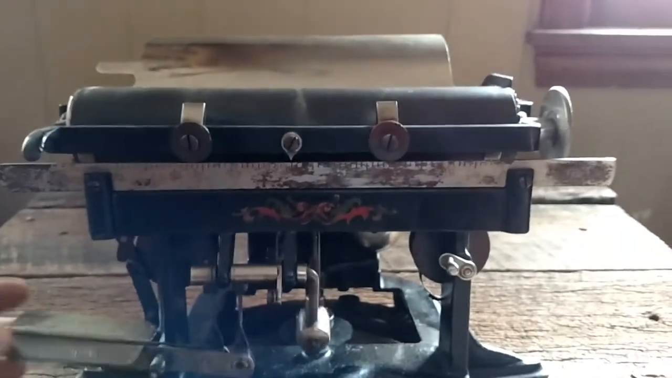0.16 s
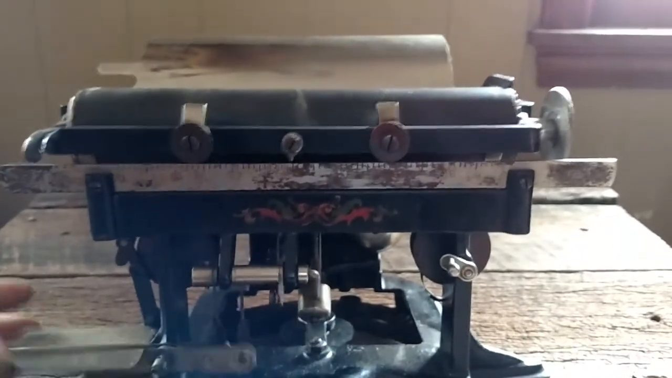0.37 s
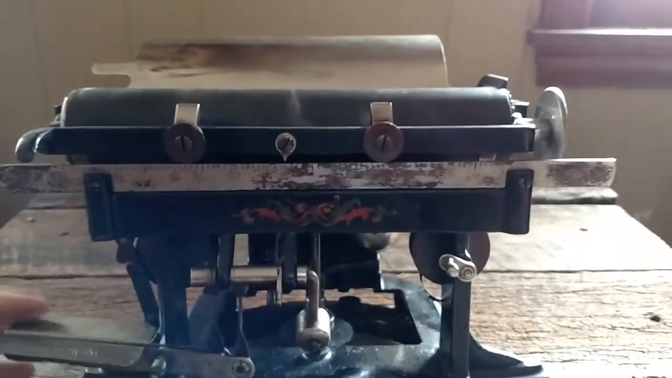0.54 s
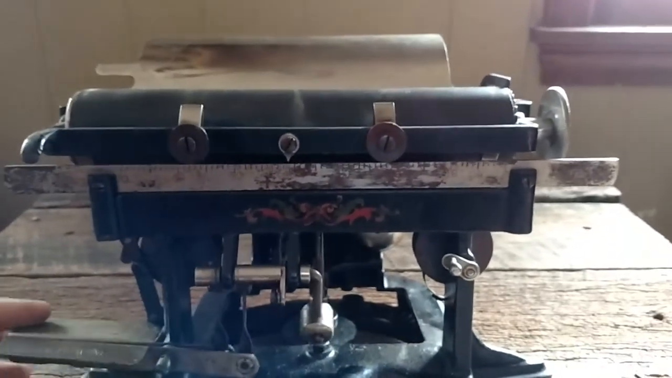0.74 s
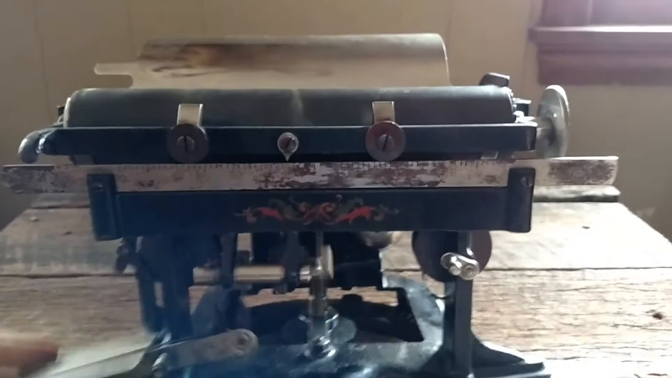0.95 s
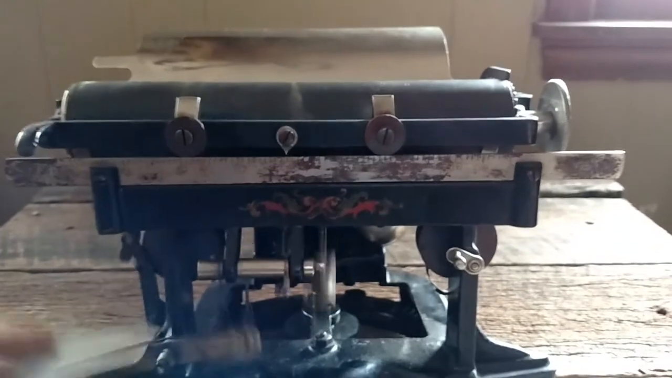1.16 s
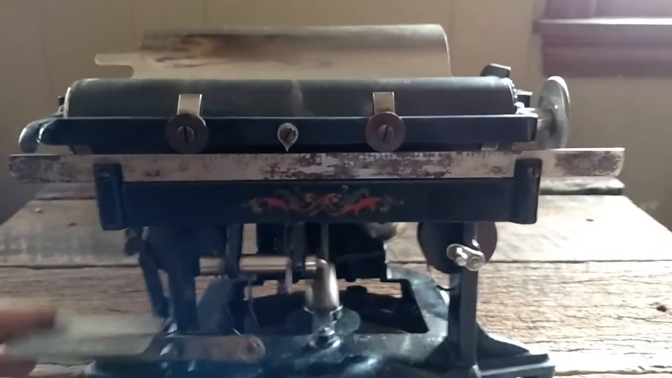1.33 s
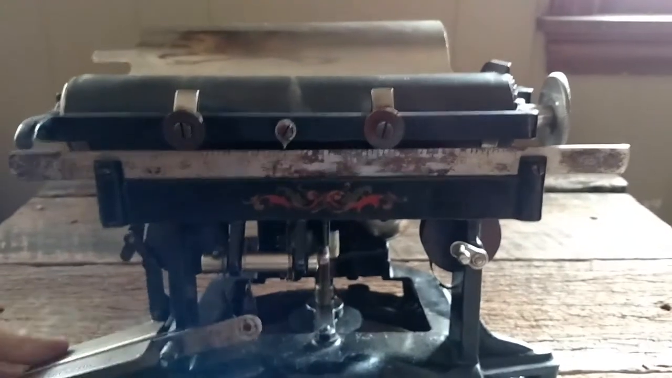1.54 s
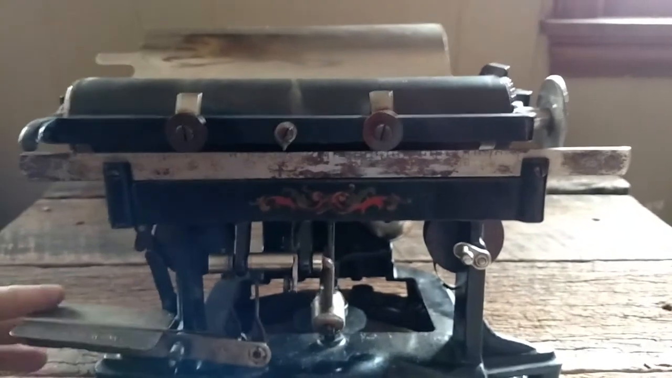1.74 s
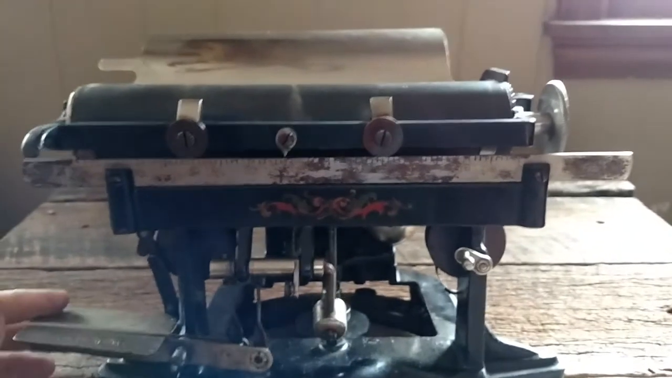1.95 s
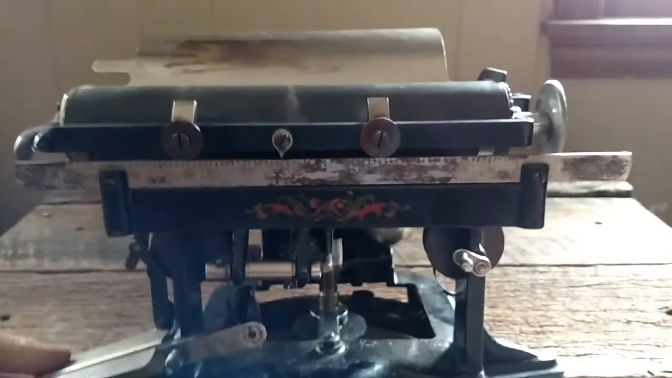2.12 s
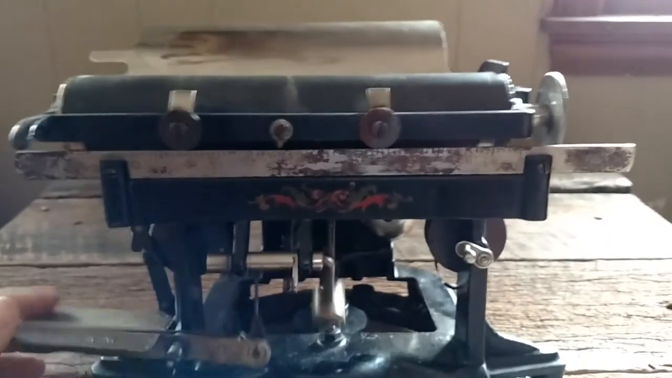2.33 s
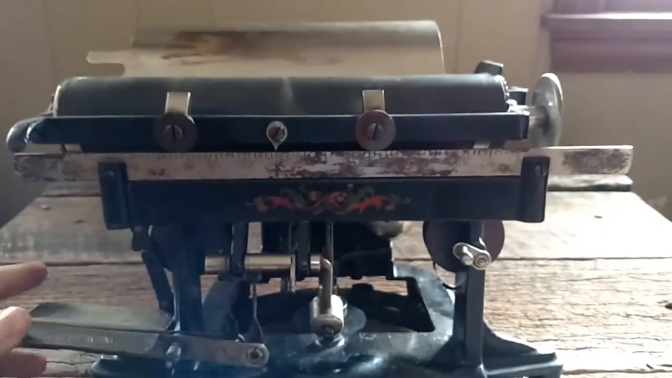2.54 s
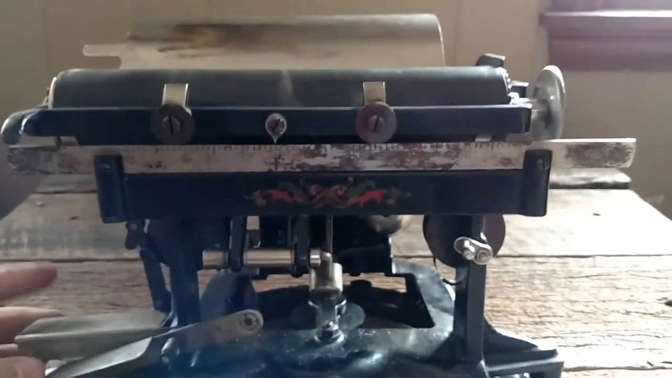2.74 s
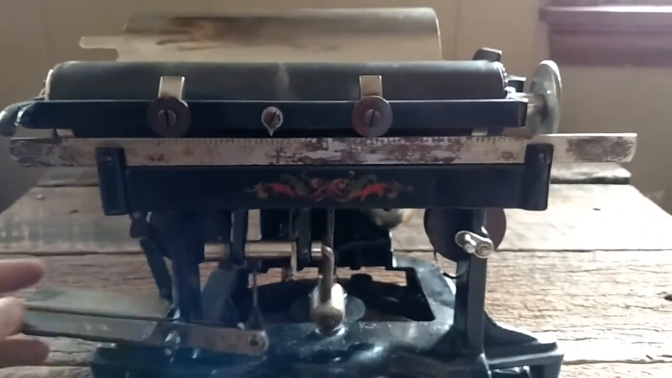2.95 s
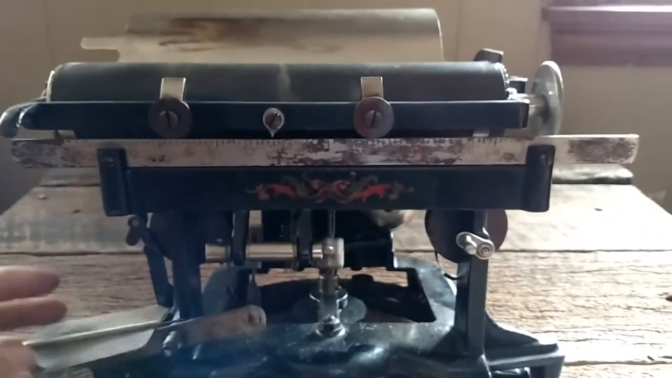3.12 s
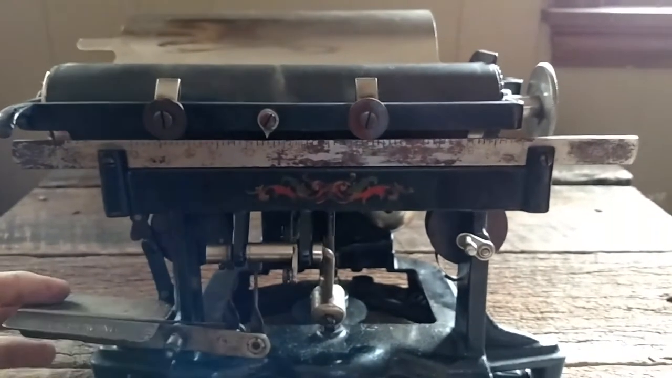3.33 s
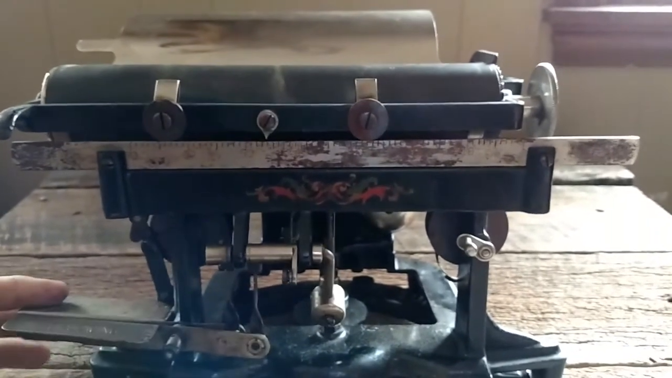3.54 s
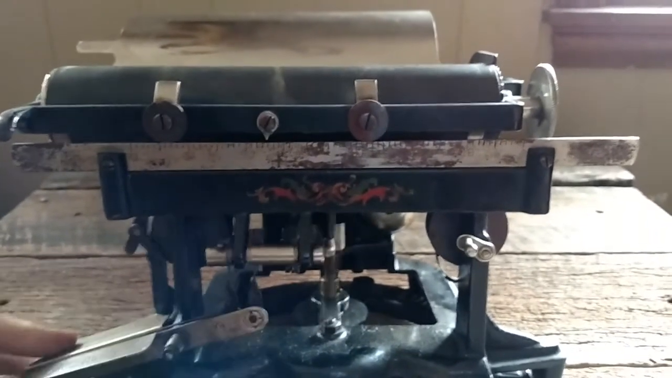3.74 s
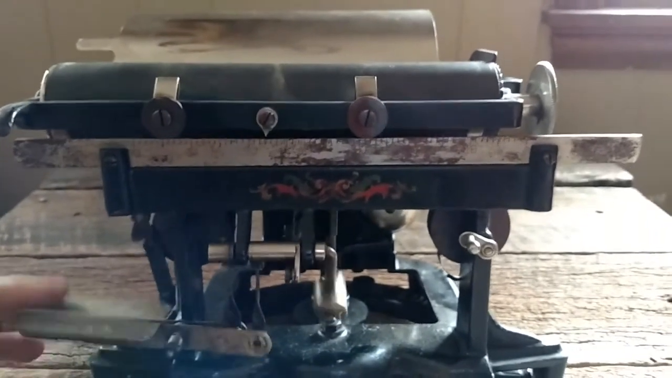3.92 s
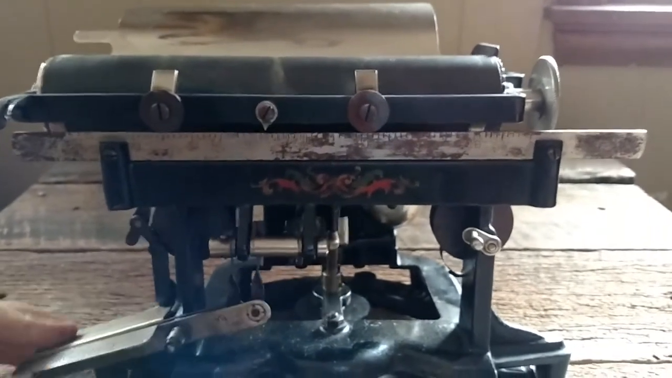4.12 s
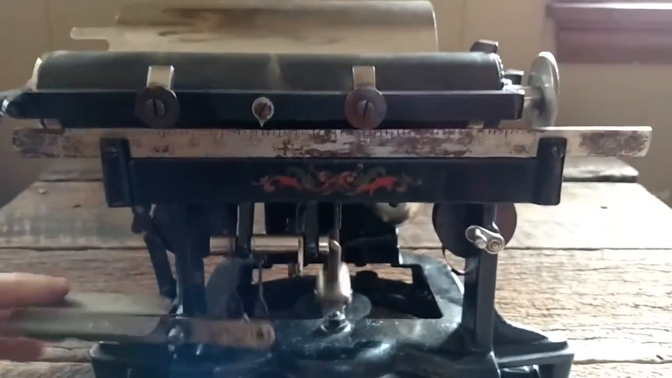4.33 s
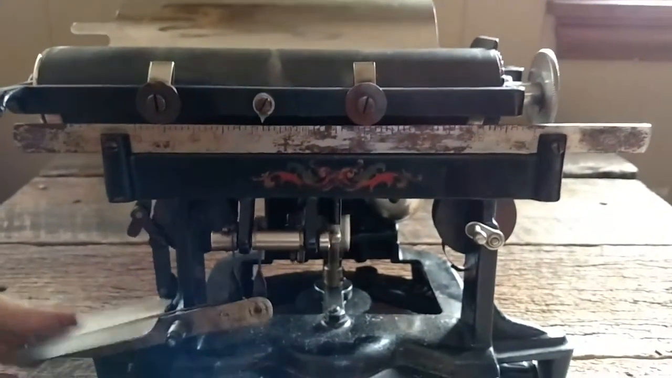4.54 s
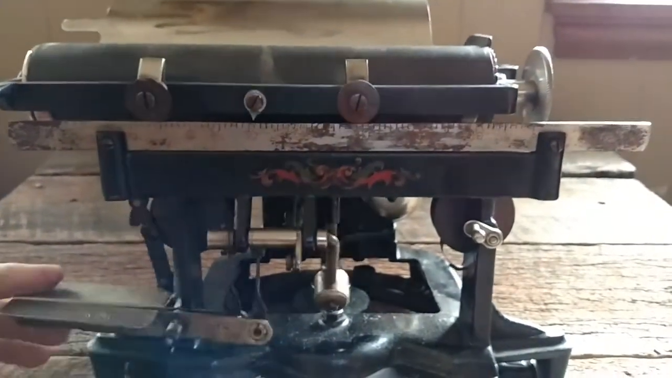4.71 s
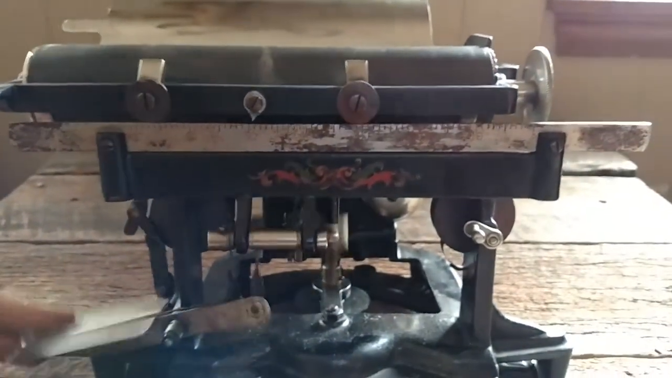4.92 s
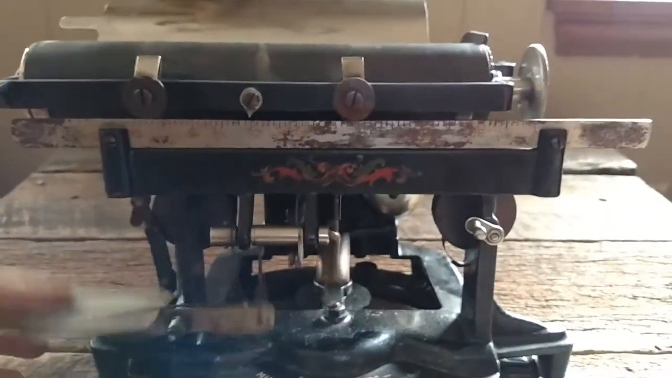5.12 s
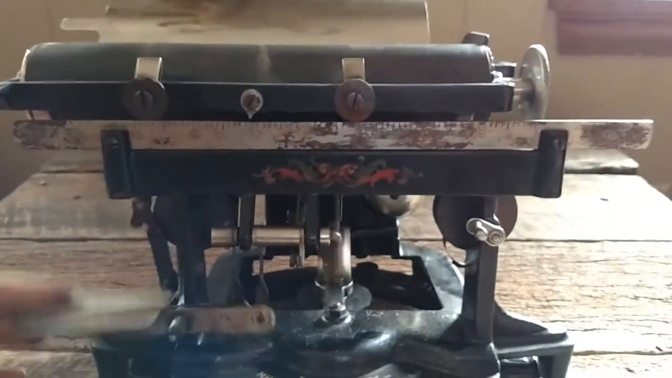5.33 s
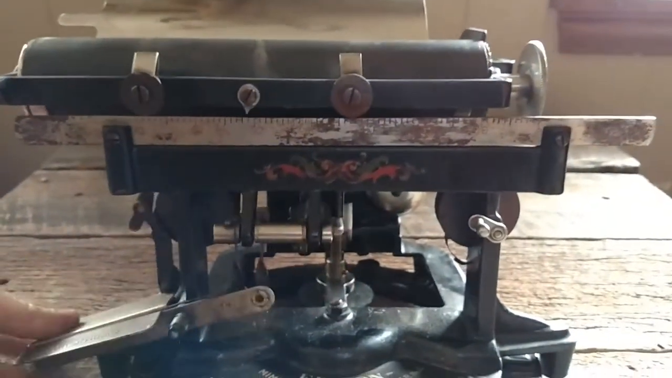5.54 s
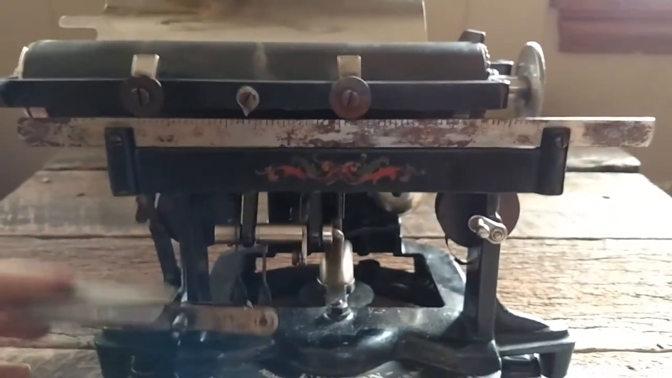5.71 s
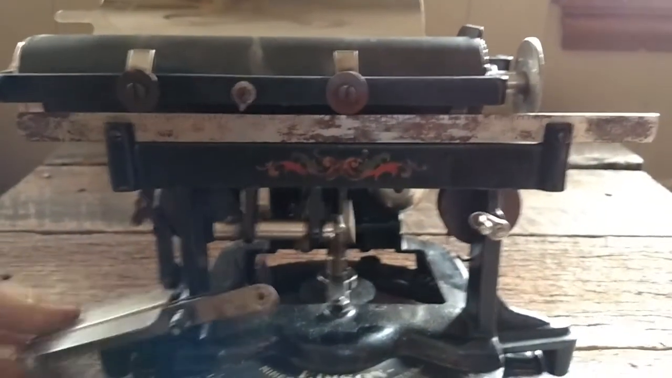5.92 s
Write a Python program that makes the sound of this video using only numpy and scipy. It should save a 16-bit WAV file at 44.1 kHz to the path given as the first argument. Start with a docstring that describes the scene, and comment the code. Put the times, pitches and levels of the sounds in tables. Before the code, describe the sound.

A close view of an old index typewriter worked by hand on a plank table in a small room, over soft room air, a low drone and very faint hiss. At about 0.05 s the lever returns with a click and dull bump; at 0.24 s a light stroke scrapes, ticks and barely touches, and returns at 0.4 s. Firm strokes at 0.86, 1.22, 1.55 and 2.16 s each give a tiny latch tick, bright metal clash, hard mid-pitched knock, small rebound and fading steely shimmer, with a low table boom. Softer returns fall between them. Handling bumps and rumble gather around 2.1-2.9 s, with gentle strokes at 2.68 and 3.03 s and small rattles. After a lull, firm strokes resume at 3.75, 4.08, 4.43, 4.87, 5.2, 5.55 and 5.96 s, the later knocks weaker, with a prominent dull bump near 4.8 s.

```python
"""Index typewriter on a plank table

An old index typewriter is worked by hand in a small room, close to the microphone.
Each printing stroke trips a latch, clashes the linkage and knocks the type head on the platen; the table booms.
Light strokes slide, tick the lever and touch down gently; returns click the pawl and jolt the planks.
Struck parts are flurries of contacts ringing resonances; bumps are swelling sines, rumble and air shaped noise."""
import sys
import numpy as np
from scipy import signal
from scipy.fft import rfft, irfft
from scipy.io import wavfile

SR = 44100
rng = np.random.default_rng(int(sys.argv[2]) if len(sys.argv) > 2 else 0)


def log_audio(samples):
    """Write samples as a 16-bit WAV file to the path given in sys.argv[1]."""
    # one column per channel
    frames = np.atleast_2d(samples).T
    # limit to full scale, then quantise
    limited = np.clip(frames, -1, 1)
    pcm = np.round(limited * 32767).astype(np.int16)
    wavfile.write(sys.argv[1], SR, pcm)


N = 263277  # length in samples

# Levels in the event tables are settings ahead of the trims in the functions.
# printing strokes: start_s, latch_lead_s, latch_db, clash_db (linkage), knock_db (head on platen),
# thud_db (into the table), shimmer_peak_hz
STROKES = [(0.8573, 0.014, -41, -39, -20.5, -40.5, 7500), (1.2238, 0.014, -40.5, -36, -23.5, -50, 6760),
           (1.5486, 0.014, -43, -35, -24.5, -43, 6800), (2.1560, 0.015, -41.5, -34.5, -26, -56, 8200),
           (3.7492, 0.01, -42, -33.5, -24.5, -40.5, 8200), (4.0802, 0.0083, -46, -32, -25, -39.5, 7300),
           (4.4258, 0.011, -50, -34, -26, -41.5, 6760), (4.8653, .014, -45.5, -34.3, -31.5, -48, 8600),
           (5.198, 0.015, -45, -31.5, -26, -44, 8300), (5.5528, .012, -43, -34, -29, -46, 9250),
           (5.964, .021, -47, -39, -36, -41, 8550)]
# light strokes that do not print: start_s, latch_db, touch_delay_s, touch_db (head)
LIGHT_STROKES = [(0.2441, -41, 0.021, -59), (2.6774, -41.5, 0.022, -33.5), (3.0325, -41, .0275, -37.5)]
# the lever comes back up and the carriage steps: start_s (pawl), lever_db, pawl_db,
# planks_db (boom), top_db (low boom of the table top)
RETURNS = [(0.0547, -44, -38, -27, -31), (0.4028, -50, -37, -29.5, -32), (1.0117, -51.5, -63, -31, -27.5),
           (1.3586, -46.5, -76, -28, -30), (1.6981, -48.6, -54, -30, -26.5), (2.3228, -49, -53.5, -28, -24),
           (2.8493, -42.5, -37, -23, -31), (3.1904, -59, -35, -38, -35.5), (3.8963, -50, -50, -30.5, -39),
           (4.2323, -56.5, -72, -35.5, -30.5), (4.5978, -49.5, -48, -30.5, -29),
           (4.996, -50.5, -53, -31, -28.5), (5.358, -47.5, -72, -28, -40), (5.705, -52, -68, -37, -34)]
# resonances of the platen: pitch_hz, width_hz, level_db
PLATEN_MODES = [(815, 80, -8.5), (1196, 135, -5.3), (1278, 135, -2.8), (1660, 80, -7), (2077, 257, 0),
                (2434, 348, -5.5)]
# resonances of the carriage pawl: pitch_hz, width_hz, level_db
PAWL_MODES = [(2900, 900, -11), (4150, 700, -6), (5350, 560, -1), (6000, 560, 0), (6880, 480, 0),
              (8350, 450, -9), (9480, 320, -4), (11100, 500, -11), (13000, 1500, -27)]
# boom spectrum of the planks: pitch_hz, level_db (per Hz)
PLANK_BOOM = [(120, -39), (180, -33), (205, 7), (230, -9), (249, 5), (272, -2), (330, -4.5), (400, -12.5),
              (520, -22), (900, -56)]
# low boom spectrum of the table top: pitch_hz, level_db (per Hz)
TOP_BOOM = [(70, -27), (108, -17), (126, 1), (139, 5.5), (155, -5), (185, -5), (260, -31), (600, -75)]

LEVER_LEAD_S = 0.010  # the lever hits its stop this long before the pawl catches


def amp(db):
    """Turns decibels into a gain."""
    return 10 ** (np.asarray(db) / 20)


def evened(x):
    """Scales to unit rms."""
    return x / np.sqrt(np.mean(x ** 2) + 1e-20)


def sized(x, db):
    """Scales a short sound to the energy of 5 ms at rms level db."""
    return x * amp(db) * np.sqrt(0.005 * SR / (np.sum(x ** 2) + 1e-20))


def read(points, hz, axis=1):
    """Reads one column of a table, joined by straight lines over log frequency."""
    columns = np.transpose(points)
    return np.interp(np.log(hz + 1), np.log(columns[0] + 1), columns[axis])


def add(mix, start_s, sound):
    """Lays a sound into the mix in place, cut off at the end."""
    part = mix[max(round(start_s * SR), 0):][:len(sound)]
    part += sound[:len(part)]


def noise(spectrum, grains_per_s=SR):
    """Noise of unit rms with the given spectrum; with few grains a second it turns lumpy."""
    sparse = rng.random(N) < grains_per_s / SR
    grains = rng.standard_normal(N) * sparse
    colour = amp(read(spectrum, np.fft.rfftfreq(N, 1 / SR)))
    return evened(irfft(rfft(grains) * colour, N))


def ring(modes, size=2048):
    """A part's answer to one tap: decaying sines; neighbours start in opposite directions, so it swells first."""
    t = np.arange(size) / SR
    out = np.zeros(size)
    for k, (hz, width, db) in enumerate(modes):
        decay = np.exp(-np.pi * width * t)  # a wider resonance dies sooner
        out += (-1) ** k * amp(db) * width * decay * np.sin(2 * np.pi * hz * t)
    return out


def varied_ring(modes, lowest, detune, spread_db):
    """No two blows land on quite the same spot, so the modes shift a little in pitch and strength."""
    pitch, strength = rng.uniform(lowest, 1, (2, len(modes)))
    return ring([(hz * (1 + detune * a), width, db + spread_db * b)
                 for (hz, width, db), a, b in zip(modes, pitch, strength)])


def chatter(rise, fall, size=1024):
    """Loose parts meeting: a short flurry of tiny contacts that feeds all pitches about equally."""
    t = np.arange(size) / SR
    envelope = (1 - np.exp(-t / rise)) * np.exp(-t / fall)  # rise and fall in s
    z = rfft(envelope * rng.standard_normal(size))
    flat = irfft(z / (abs(z) + 1e-12))
    return flat * np.sqrt(envelope / envelope.max())


def tilted(x, corner_hz):
    """Softens the treble above a corner; the very top falls away faster."""
    r = np.exp(-2 * np.pi * corner_hz / SR)
    return signal.lfilter([1 - r, 1 - r], [1, -r], x) / 2


def blows(rows, modes, rise, fall, crack_db, crack_hz):
    """Each blow is a flurry of contacts: it rings the part's modes and is heard itself as a crack."""
    out = np.zeros(N)
    for start_s, db in rows:
        body = varied_ring(modes, lowest=-1.12, detune=0.025, spread_db=3)
        force = chatter(rise, fall)
        add(out, start_s, sized(signal.fftconvolve(force, body), db))
        add(out, start_s, sized(tilted(force, crack_hz), db + crack_db))
    return out


def background():
    """Room air, a low drone and a thin band of high hiss, each steady shaped noise."""
    # spectrum of the room air: pitch_hz, level_db (per Hz)
    air_spectrum = [(240, -23), (400, -4.5), (536, -13.5), (598, -10.5), (697, -5.5), (879, -8.5),
                    (1110, -3.5), (1530, -6.5), (2630, -13.5), (3310, -21.5), (3580, -20), (5190, -29.5),
                    (9760, -37.5), (10900, -36), (16000, -65)]
    drone = noise([(20, -48), (60, -14), (138, -4.5), (175, -18.0), (250, 2), (290, -6),
                   (400, -10.5), (600, -27.5), (1500, -51)])
    hiss = noise([(9000, -50), (10400, -12), (10800, 14), (11200, -15), (12500, -50)])
    return amp(-55) * noise(air_spectrum) + amp(-48.5) * drone + amp(-84) * hiss


def handling():
    """A lumpy rumble grows whenever the hands shift and press, and the table booms along with it."""
    # spells of shifting hands: start_s, end_s, effort_db (ahead of the blend below)
    shifts = [(0.01, 0.142, -37), (0.33, 0.586, -51.5), (1.252, 1.445, -44.5), (1.744, 1.802, -49),
              (2.052, 2.56, -43), (2.684, 2.98, -41.5), (3.617, 3.705, -49), (5.123, 5.3, -50.5),
              (5.403, 5.755, -55)]
    # spectrum of the rumble: pitch_hz, level_db (per Hz)
    rumble_spectrum = [(15, -2.5), (30, -10.5), (55, -5.5), (85, -6), (110, -4), (160, -42.5), (400, -76)]
    resting_db, fade_s, grains_per_s = -51, 0.049, 900
    t = np.arange(N) / SR
    effort = np.full(N, amp(resting_db))
    for start, end, db in shifts:
        effort += amp(db) * np.interp(t, [start - fade_s, start, end, end + fade_s], [0, 1, 1, 0])
    rumble = amp(-1.5) * noise(rumble_spectrum, grains_per_s)
    top = amp(-5.5) * noise(TOP_BOOM, grains_per_s)
    planks = amp(-12) * noise(PLANK_BOOM, grains_per_s)
    return effort * (rumble + top + planks)


def lever():
    """The key lever ticks as it trips the latch and as the head touches, and more dully back at its stop."""
    # resonances of the key lever: pitch_hz, width_hz, level_db
    lever_modes = [(2210, 165, 2), (2700, 140, 3), (3250, 185, 9), (4680, 190, -3.5), (5340, 1400, -15.5),
                   (6150, 180, -0.5), (6800, 260, -8), (8300, 1640, -12.5)]
    touch_tick_db = -19.5  # tick of the lever against the touch setting of the head
    ticks = [(s - lead, db) for s, lead, db, *_ in STROKES]
    for s, db, delay, touch_db in LIGHT_STROKES:
        ticks += [(s, db), (s + delay, touch_db + touch_tick_db)]
    stops = [(s - LEVER_LEAD_S, db) for s, db, *_ in RETURNS]
    tripping = blows(ticks, lever_modes, rise=0.00023, fall=0.0027, crack_db=-12.5, crack_hz=2500)
    stopping = blows(stops, lever_modes, rise=0.00035, fall=0.0023, crack_db=-22, crack_hz=2500)
    return amp(2.05) * tripping + amp(4.55) * tilted(stopping, corner_hz=3000)


def booms(rows, spectrum, peak_s, steepness):
    """Each push sets the wood shaking: the boom swells to a peak and dies away."""
    out, wood = np.zeros(N), noise(spectrum)
    u = np.arange(SR // 3) / SR / peak_s
    swell = (u * np.exp(1 - u)) ** steepness
    for start_s, db in rows:
        stretch = np.roll(wood, -round(start_s * SR))[:len(u)]
        add(out, start_s, sized(swell * stretch, db))
    return out


def sway():
    """The table top gives under each stroke; carriage steps jolt the planks, then the top as it all settles."""
    pushes = [(s, -32) for s, *_ in STROKES]
    jolts = [(s - LEVER_LEAD_S, db) for s, _, _, db, _ in RETURNS]
    settles = [(s, db) for s, *_, db in RETURNS]
    pressed = booms(pushes, TOP_BOOM, peak_s=0.021, steepness=0.72)
    jolted = booms(jolts, PLANK_BOOM, peak_s=0.021, steepness=0.59)
    settling = booms(settles, TOP_BOOM, peak_s=0.066, steepness=3.3)
    return pressed + jolted + settling


def pawl():
    """The pawl catches a tooth at each step of the carriage, and loose parts rattle between strokes."""
    # loose parts settling: start_s, level_db
    rattles = [(0.204, -61), (0.4969, -60), (1.1524, -64), (2.4053, -58), (2.8233, -59), (2.8929, -53),
               (2.9319, -60)]
    clicks = [(s, db) for s, _, db, *_ in RETURNS] + list(rattles)
    return blows(clicks, PAWL_MODES, rise=0.0001, fall=0.0031, crack_db=-10, crack_hz=3940)


def bumps():
    """Dull handling bumps: sines that swell and die within a few cycles."""
    # bumps: start_s, peak_db, pitch_hz, rise_s
    bump_rows = [(0.055, -19.5, 132, 0.0086), (0.064, -24, 78, 0.0079), (0.644, -29, 87, 0.01),
                 (1.358, -29, 148, 0.0086), (1.389, -23, 97, 0.0082), (2.252, -25.5, 166, 0.0028),
                 (2.295, -23.5, 122, 0.0047), (2.399, -20.5, 111, 0.0026), (2.506, -26, 102, 0.0044),
                 (2.756, -33, 127, .014), (2.876, -26.5, 253, 0.01), (4.798, -14, 250, 0.0012),
                 (5.149, -32.5, 83, 0.013), (5.229, -26, 200, 0.0032), (5.349, -25, 260, 0.0018),
                 (5.4462, -20, 224, 0.002), (5.722, -28.5, 90, 0.0091)]
    out, t = np.zeros(N), np.arange(SR // 4) / SR
    for start_s, db, hz, rise in bump_rows:
        swell = (t / rise * np.exp(1 - t / rise)) ** 2
        add(out, start_s, amp(db) * swell * np.sin(2 * np.pi * hz * t))
    return out


def slides():
    """Before a light stroke steel slides on steel in tiny slips, growing stronger until the lever catches."""
    # spectrum of the scrape: pitch_hz, level_db (per Hz)
    scrape_spectrum = [(2500, -10), (4500, 7), (5800, -4), (6800, 5), (7800, -1), (9400, -10), (10500, -14),
                       (15000, -24)]
    slide_s, catch_db, slips_per_s = 0.047, -58.5, 3800
    level = np.zeros(N)
    growth = np.sqrt(np.linspace(0, 1, round(slide_s * SR)))
    for start_s, *_ in LIGHT_STROKES:
        add(level, start_s - slide_s, growth)
    return amp(catch_db) * level * noise(scrape_spectrum, slips_per_s)


def spring():
    """A light stroke brushes a small spring with the lever: noise through two resonances buzzes and dies."""
    # resonances of the spring: pitch_hz, width_hz, level_db
    spring_modes = [(6040, 380, 3), (7340, 270, -7)]
    start_db, t60_s = -60, 0.52
    out, t = np.zeros(N), np.arange(SR // 3) / SR
    for start_s, *_ in LIGHT_STROKES:
        brush = rng.standard_normal(len(t))
        buzz = evened(signal.fftconvolve(brush, ring(spring_modes), "same"))
        add(out, start_s, buzz * amp(start_db - 60 * t / t60_s))
    return out


def touches():
    """In a light stroke the type head comes down gently and rings its own modes."""
    # resonances of the type head: pitch_hz, width_hz, level_db
    head_modes = [(1094, 90, -15), (1232, 69, -2), (1940, 140, -21), (2310, 290, -22)]
    taps = [(s + delay, db) for s, _, delay, db in LIGHT_STROKES]
    return blows(taps, head_modes, rise=0.00029, fall=0.0013, crack_db=-35, crack_hz=1500)


def strikes():
    """The linkage clashes, the head lands on the platen with one clean knock, and both rebound."""
    # resonances of the linkage: pitch_hz, width_hz, level_db
    linkage_modes = [(2740, 920, 3.5), (3300, 170, 13), (3935, 104, 12.5), (4420, 210, 7), (5210, 240, 7.5),
                     (6570, 63, 7), (7320, 460, -1), (8740, 130, 0.5), (10500, 400, -8), (12900, 4300, -12)]
    head_delay_s, rebound_s = 0.002996, 0.0076  # after the clash
    start_s, _, _, clash_db, knock_db = np.transpose(STROKES)[:5]
    clashes = zip(start_s, clash_db + 0.5)
    rebounds = zip(start_s + rebound_s, clash_db - 28)
    bounces = zip(start_s + rebound_s, knock_db - 13.5)  # the head's second, smaller knock
    out = blows(clashes, linkage_modes, rise=0.0039, fall=0.0012, crack_db=-11.5, crack_hz=5000)
    # the linkage's rebound rings with the modes of the pawl
    out += blows(rebounds, PAWL_MODES, rise=0.00046, fall=0.0012, crack_db=-3, crack_hz=5000)
    out += blows(bounces, PLATEN_MODES, rise=0.00097, fall=0.0017, crack_db=-33, crack_hz=2000)
    for at, db in zip(start_s + head_delay_s, knock_db):
        add(out, at, sized(knock(), db + 0.2))
    return out


def knock():
    """One knock of the type head on the platen, with the lows below about 680 Hz cut."""
    body = varied_ring(PLATEN_MODES, lowest=-0.64, detune=0.033, spread_db=4.5)
    low_cut = signal.butter(2, 680, "highpass", fs=SR, output="sos")
    return signal.sosfilt(low_cut, body)


def shimmer():
    """Springs and thin steel ring on after each clash; which ring most depends on where the carriage stands."""
    # spectrum of the small steel parts: pitch_hz, level_db (per Hz)
    shimmer_spectrum = [(2500, -30), (4000, -2), (5600, -3), (7000, -8.5), (8500, -10.5), (10000, -17.5),
                        (12000, -14), (15500, -21)]
    level_db, t60_s, swell_s = -52, 0.42, 0.0081
    lift_db, lift_width_hz = 9.5, 1300  # around the stroke's own shimmer pitch
    out, t = np.zeros(N), np.arange(SR // 2) / SR
    hz = np.fft.rfftfreq(len(t), 1 / SR)
    for start_s, *_, peak_hz in STROKES:
        lift = lift_db * np.exp(-((hz - peak_hz) / lift_width_hz) ** 2)
        colour = amp(read(shimmer_spectrum, hz) + lift)
        spray = evened(irfft(rfft(rng.standard_normal(len(t))) * colour, len(t)))
        add(out, start_s, spray * amp(level_db - 60 * t / t60_s) * (1 - np.exp(-t / swell_s)))
    return out


def table():
    """The machine rocks on its feet after each stroke and sets the planks booming."""
    # resonances of the planks: pitch_hz, width_hz, level_db
    plank_modes = [(144.5, 11, -9), (215, 57, -12.5), (249.8, 15.5, 2), (313.4, 7.1, -4.5), (423, 25, -12)]
    out, planks = np.zeros(N), ring(plank_modes, size=12000)
    for start_s, *_, thud_db, _ in STROKES:
        rocking = chatter(rise=0.025, fall=0.0123, size=4096)
        add(out, start_s + 0.01237, sized(signal.fftconvolve(rocking, planks), thud_db + 13.5))
    return out


def room(x):
    """Direct sound, a few reflections, and the diffuse tail."""
    # early reflections from table, frame and wall: delay_s, gain (linear)
    reflections = [(.0035, 0.037), (.0061, 0.029), (.008, -0.081), (.0095, 0.083), (.0182, 0.0094),
                   (.03, 0.051), (.0392, 0.072)]
    out = x + cycled_tails(x)
    for delay, gain in reflections:
        add(out, delay, gain * x)
    return out


def cycled_tails(x, count=4):
    """Diffuse tail: the sound fades round a cycle of several noise tails, 0.35 s apart."""
    turn = np.arange(N) / SR / 0.35
    offset = turn - np.arange(count)[:, None]
    away = abs((offset + count / 2) % count - count / 2)  # steps from each tail's turn
    return sum(tail(x * np.cos(np.pi / 2 * np.minimum(steps, 1))) for steps in away)


def tail(x):
    """A diffuse tail: noise that dies at its own rate in each band."""
    # the room's tail: pitch_hz, t60_s, level_db
    room_bands = [(202, 0.35, 18), (755, 0.62, -6.5), (1230, 0.61, -3.5), (1560, 0.76, 0.5),
                  (2000, 0.53, -11.5), (3480, 0.71, -10.5), (5940, 0.62, -10), (8850, 0.78, -17.5),
                  (15000, 0.42, -25)]
    size = 32768
    hz, t, z = signal.stft(rng.standard_normal(size), SR, nperseg=256)
    t60 = read(room_bands, hz)[:, None]
    level_db = read(room_bands, hz, axis=2)[:, None]
    unit_energy = np.sqrt(np.log(1e6) / (t60 * SR))  # long and short bands alike
    decay = amp(level_db - 60 * t / t60) * unit_energy
    response = signal.istft(z * decay, SR, nperseg=256)[1][:size]
    response *= 1 - np.exp(-(np.arange(size) / SR / 0.00077) ** 2)  # soft onset
    return signal.fftconvolve(x, response)[:N]


def scene():
    """The machine in its room, over the table, the hands and the still air."""
    struck = strikes() + lever() + pawl() + touches() + slides()
    machine = room(struck) + shimmer() + spring()
    wood = table() + sway()
    return (machine + wood + bumps() + handling() + background())[None]


def record(dry):
    """The recorder's band limit: a steep low-pass at 15550 Hz."""
    low_pass = signal.firwin(301, 15550, window=("kaiser", 8), fs=SR)
    return signal.oaconvolve(dry, low_pass[None], "same")


dry = scene()
out = record(dry)
log_audio(out)
```